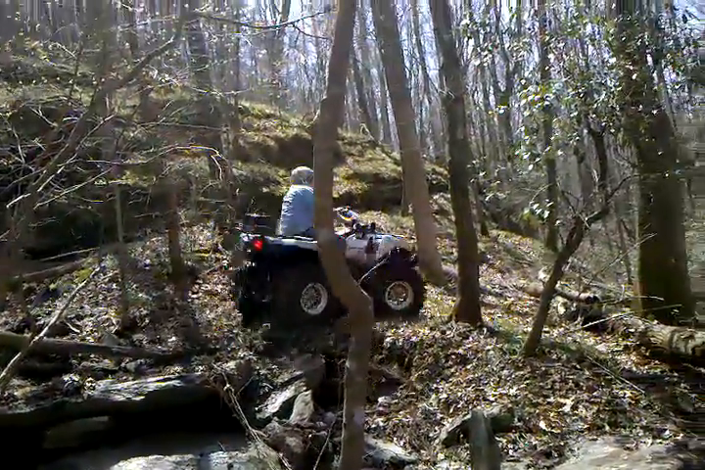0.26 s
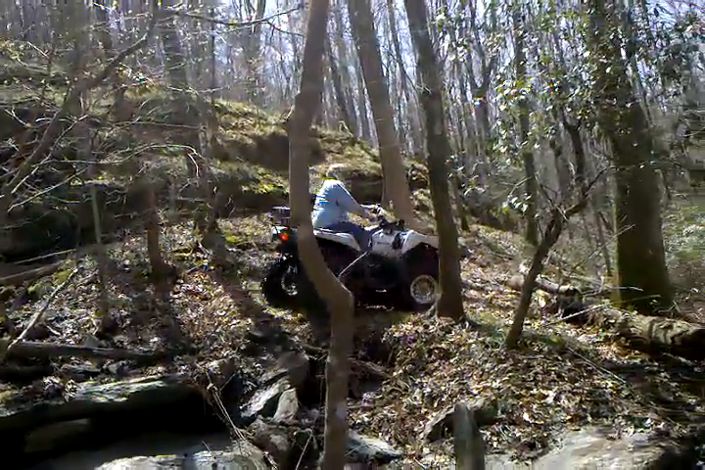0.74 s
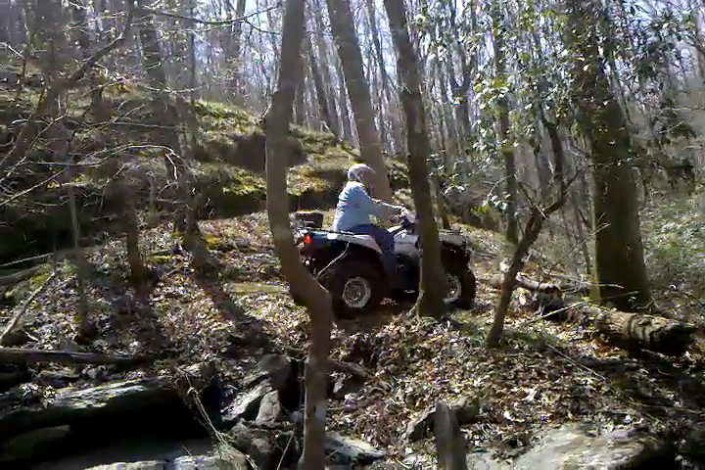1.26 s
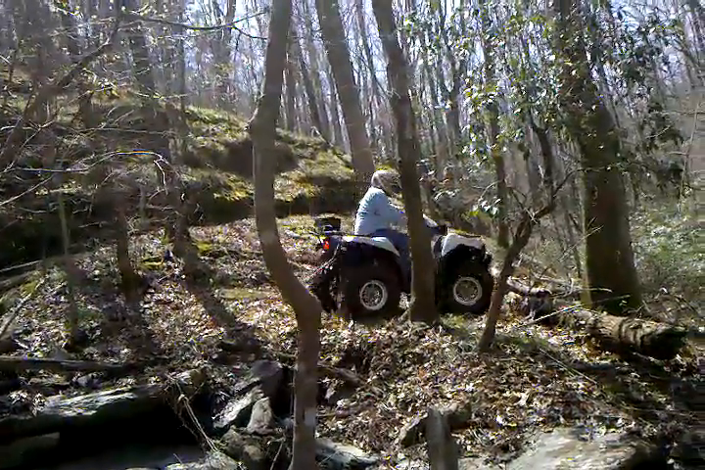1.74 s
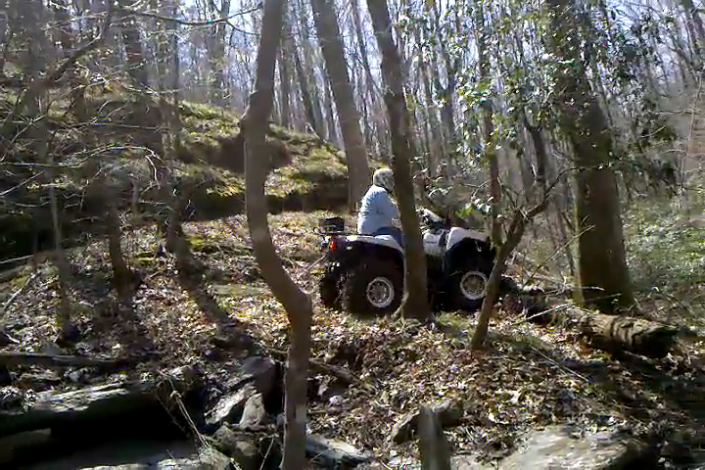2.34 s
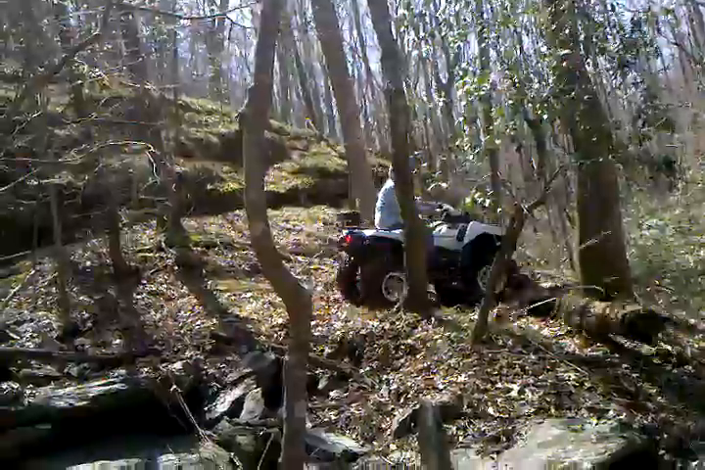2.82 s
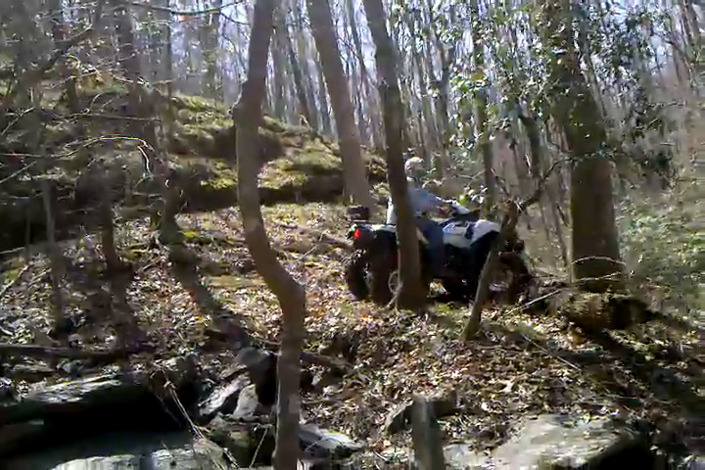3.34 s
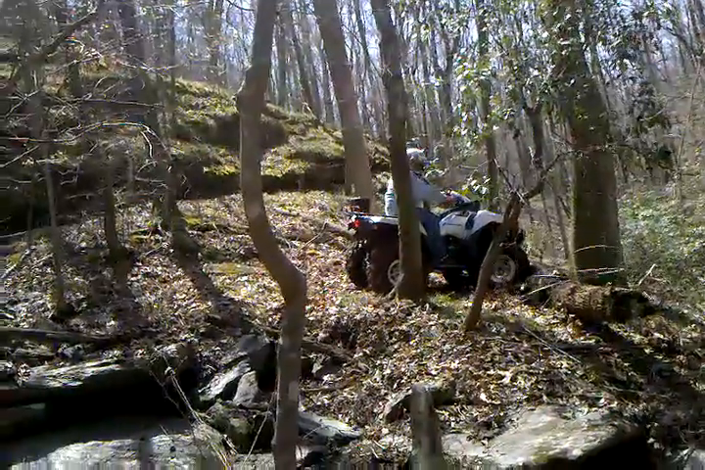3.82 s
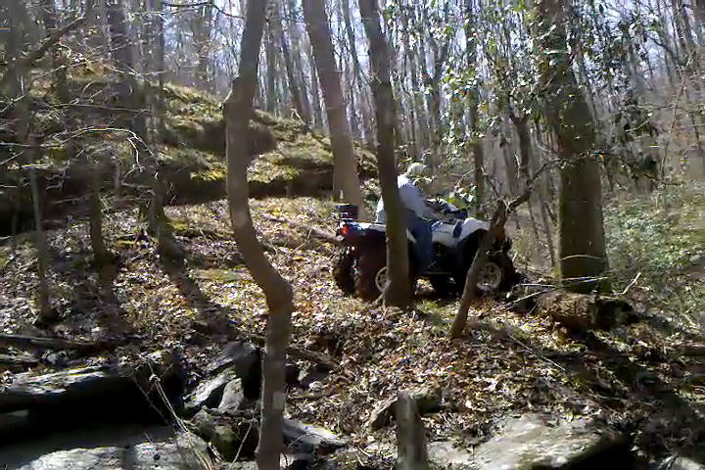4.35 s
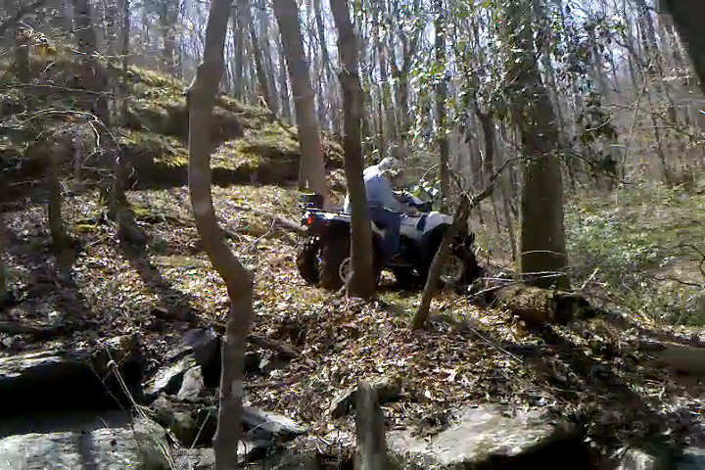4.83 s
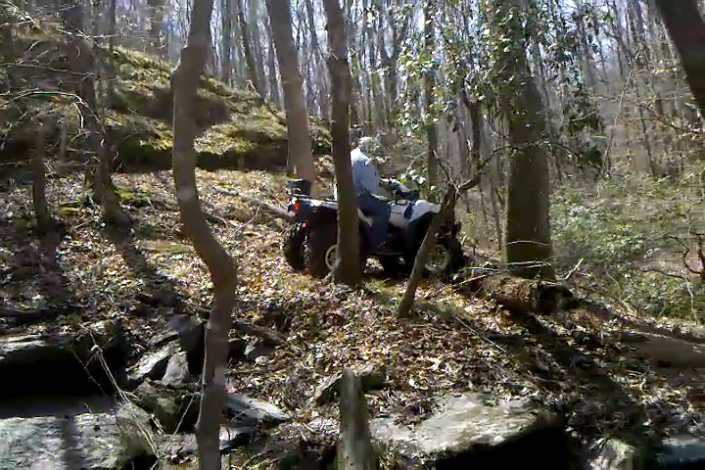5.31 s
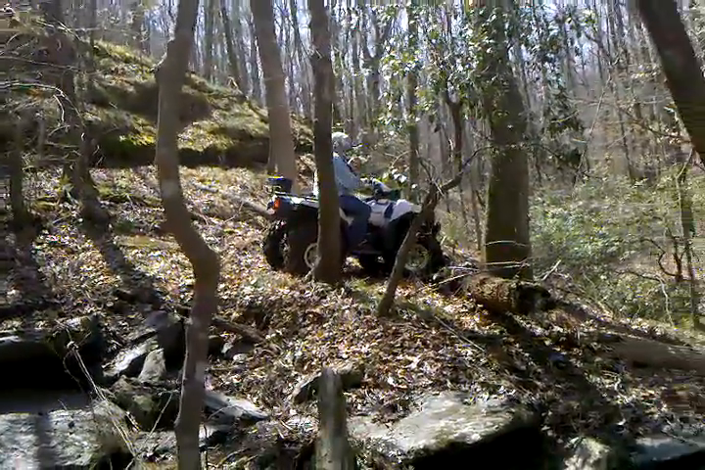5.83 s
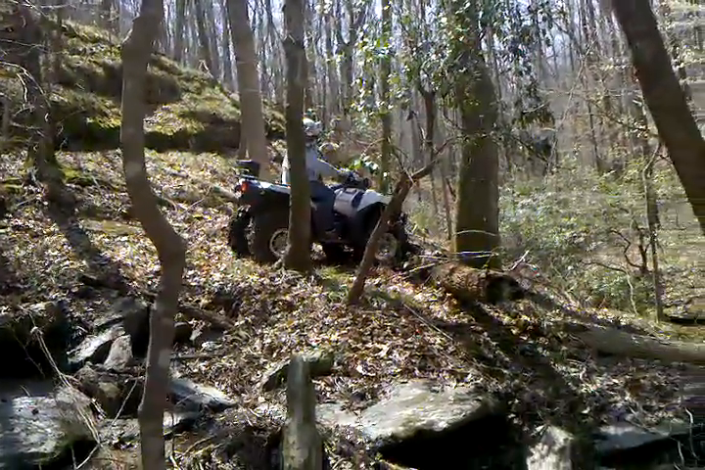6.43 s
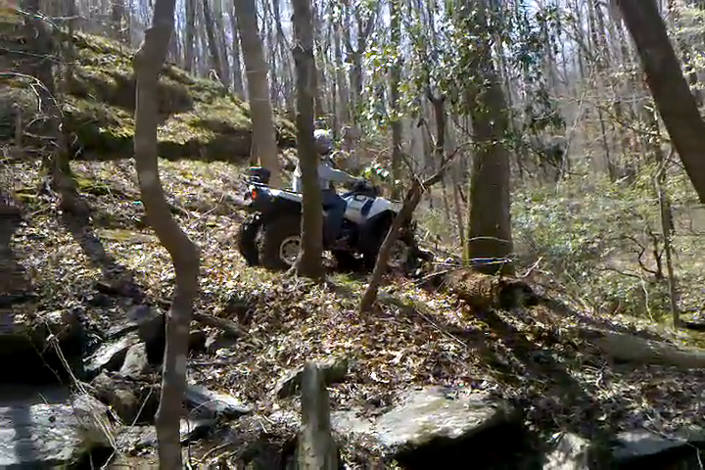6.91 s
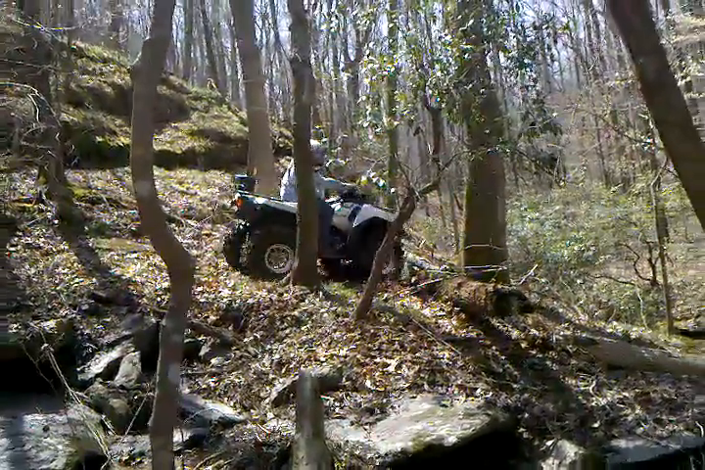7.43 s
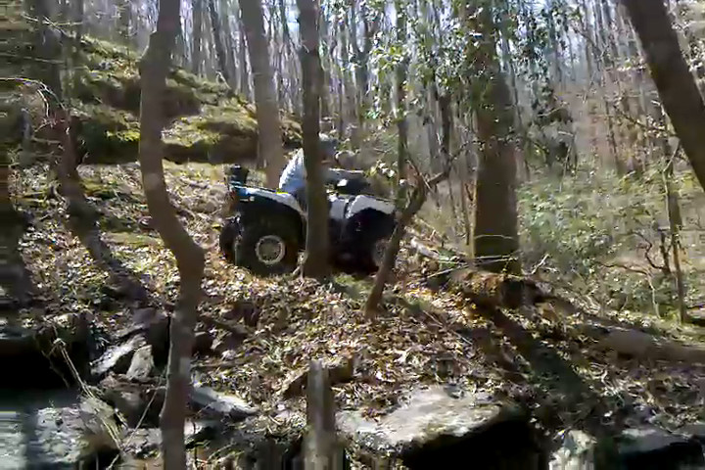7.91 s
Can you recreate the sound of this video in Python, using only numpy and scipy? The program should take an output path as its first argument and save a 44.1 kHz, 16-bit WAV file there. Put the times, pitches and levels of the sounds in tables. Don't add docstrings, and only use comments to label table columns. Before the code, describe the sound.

A single-cylinder quad bike thumps slowly outdoors in a wood, with short soft throttle blips, then settles into an uneven idle. Leaves crunch and twigs snap in clusters around three and five seconds. After six seconds it revs in stronger bursts, firing nearly twice as fast with rougher barks and loud leaf crunches. Rattle and brook hiss run throughout; a small microphone gives thin bass and dull treble.

```python
import sys
import numpy as np
from scipy import signal
from scipy.io import wavfile

SR = 44100
rng = np.random.default_rng(int(sys.argv[2]) if len(sys.argv) > 2 else 0)


def amplitude_ratio(level_db):
    exponent = np.asarray(level_db, float) / 20
    return 10 ** exponent


def put_to_file(sound):
    columns = np.atleast_2d(sound).T
    safe = np.clip(columns, -1, 1)
    whole_steps = np.round(safe * 32767)
    wavfile.write(sys.argv[1], SR, whole_steps.astype(np.int16))


N = 359856
IDLE_DB = -28


def rms_one(x):
    return x / np.sqrt(np.mean(x ** 2) + 1e-20)


def over_time(times_s, values):
    return np.interp(np.arange(N) / SR, times_s, values)


def resonance(x, hz, width_hz):
    r = np.exp(-np.pi * width_hz / SR)
    feedback = [1, -2 * r * np.cos(2 * np.pi * hz / SR), r * r]
    return signal.lfilter(np.array([1, 0, -1]) * (1 - r * r) / 2, feedback, x)


def rings(drive, modes):
    total = 0
    for k, (hz, width_hz, db) in enumerate(modes):
        total = total + (-1) ** k * amplitude_ratio(db) * resonance(drive, hz, width_hz) / np.sqrt(width_hz)
    return rms_one(total)


def band(x, low_hz, high_hz):
    return signal.sosfilt(signal.butter(2, [low_hz, high_hz], "band", fs=SR, output="sos"), x)


def drift(rate_hz):
    r = np.exp(-80 * np.pi * rate_hz / SR)
    slow = signal.lfilter([1], [1, -2 * r, r * r], rng.standard_normal(N // 40 + 2002))[2000:]
    return np.interp(np.arange(N) / 40, np.arange(len(slow)), rms_one(slow))


def clicks(seconds, sizes):
    out = np.full(N + SR, 1e-18)
    np.add.at(out, np.round(np.asarray(seconds) * SR).astype(int), sizes)
    return out[:N]


def grains(per_s, spread_db):
    sizes = amplitude_ratio(spread_db * np.minimum(rng.exponential(1, (2, N)), 5))
    sizes = sizes * rng.choice([-1, 1], (2, N))
    return sizes * (rng.random((2, N)) < per_s / SR)


def coloured(sources, spectrum, patchy_db):
    hz, level_db = np.transpose(spectrum)
    out, edges = 0, 200 * 2 ** np.arange(0, 5.5, 1 / 3)
    for k, (low, high) in enumerate(zip(edges, edges[1:])):
        gain_db = np.interp(np.log(low * high) / 2, np.log(hz), level_db, left=-60)
        flicker_db = patchy_db * drift(21)
        out = out + amplitude_ratio(gain_db + flicker_db) * band(sources[k % 2], low, high)
    return rms_one(out)


def firings():
    # firings so far, gap to the next/ms
    pace = [(0, 61.57), (5, 73.93), (9, 63.35), (14, 61.44), (25, 82.27), (37, 60.65), (49, 87.25),
            (52, 71.67), (57, 87.74), (82, 86.12), (83, 71.03), (100, 41.52), (108, 40.35), (116, 53.45),
            (121, 37.4), (126, 34.8)]
    # firings so far, change of the gap/ms
    flicks = [
        (32, -6.46),
        (41, -9.99),
        (42, -13.87),
        (51, -16.86),
        (82, -30.88),
        (87, -14.09),
        (96, -6.21),
        (114, -11.65),
    ]
    # from t/s, hold/s, pressure above idle/dB
    throttle = [(.12, .12, 1), (.33, .25, 3), (.6, .1, 6.5), (.74, .34, 7.3), (1.39, .12, 2.5),
                (1.85, .25, 2.5), (2.17, .04, 4.5), (2.24, .12, 7), (2.5, .1, 6.5), (2.81, .08, 6.7),
                (3.52, .08, 3.3), (3.94, .04, 2), (6.11, .15, 10), (6.27, .55, 8), (6.43, .05, 9),
                (6.8, .04, 10.5), (6.86, .08, 12), (6.9, .5, 11), (7.38, .15, 11), (7.55, .36, 10.7),
                (7.9, .3, 12.2)]
    # t/s, loss/dB
    lean = [
        (.018, -8),
        (1.266, -5),
        (2.449, -1.5),
        (2.995, -8),
        (3.37, -2),
        (7.629, -1.5),
    ]
    first_s, flick_fades_firings, closing_db_per_s = .0167, 2.5, 25
    count, gap_ms = np.transpose(pace)
    each = np.arange(count[-1] + 1)
    gaps = np.interp(each, count, gap_ms)
    for first, change_ms in flicks:
        gaps += change_ms * (each >= first) * np.exp(-abs(each - first) / flick_fades_firings)
    at = first_s + np.r_[0, np.cumsum(gaps)] / 1000
    open_db = []
    for s, hold_s, db in throttle:
        sag_db = closing_db_per_s * np.maximum(at - s - hold_s, 0)
        open_db.append((at >= s) * (db - sag_db))
    level_db = IDLE_DB + np.maximum(np.max(open_db, axis=0), 0)
    for s, loss_db in lean:
        level_db[np.argmin(abs(at - s))] += loss_db
    return at, amplitude_ratio(level_db)


def baffles(x):
    return x - 2 * resonance(x, 225, 75)


def silencer(at, pressure):
    # from t/s, push lag/ms, push share, return lag/ms, return share
    after_puffs = [(0, 11.9, 0.92, 19.4, -0.94), (0.6, 12, 0.95, 16.3, 0.95),
                   (1.25, 13.4, 0.49, 20.5, -0.88), (2.17, 11.1, 0.89, 26.3, -0.44),
                   (3, 15.8, -0.86, 20.1, -1.09), (3.5, 7.4, 0.54, 18.1, 1.1),
                   (3.93, 6.03, -0.6, 21.75, -0.62), (6.1, 10.5, 0.69, 18.6, 0.26),
                   (6.85, 6.95, -0.29, 14, -0.5), (7.43, 10.4, 0.68, 18.3, 0.17),
                   (7.9, 7.23, -0.63, 27.3, -0.37)]
    # f/Hz, width/Hz
    pipe_modes = [(70.0, 240.5), (80.0, 274.3)]
    # f/Hz, width/Hz, gain
    chambers = [(145.0, 28.01, 16.48), (145.0, 22.57, -23.79), (225.09, 41.06, 1.32), (70.0, 44.65, 0.67),
                (328.3, 120.0, 0.74)]
    idle_puff_ms, sharper_ms_per_db, shortest_puff_ms = 1.15, .065, .47
    after_puffs = np.array(after_puffs)
    stretch = np.searchsorted(after_puffs[:, 0], at + .006) - 1
    _, push_ms, push, back_ms, back = after_puffs[stretch].T
    gas = 0
    for k in np.unique(stretch):
        size = pressure * (stretch == k)
        train = clicks(at, size)
        train = train + clicks(at + push_ms / 1000, size * push)
        train = train + clicks(at + back_ms / 1000, size * back)
        load_db = 20 * np.log10(size[size > 0].mean()) - IDLE_DB
        puff_ms = max(idle_puff_ms - sharper_ms_per_db * load_db, shortest_puff_ms)
        puff = signal.windows.gaussian(501, puff_ms / 1000 * SR)
        gas = gas + signal.oaconvolve(train, puff, "same")
    for hz, width_hz in pipe_modes:
        gas = resonance(gas, hz, width_hz)
    thump = -.8945 * gas
    for hz, width_hz, gain in chambers:
        thump = thump + gain * resonance(gas, hz, width_hz)
    thump = baffles(thump - .55 * resonance(thump, 55, 34))
    revs = np.clip(over_time(at, (1 / np.gradient(at) - 19) / 5), 0, 1)
    return thump - revs * resonance(thump, 66, 60)


def tail_pipe(at, pressure, bark_db):
    # f/Hz, width/Hz, level/dB
    tail_modes = [(309, 45, 0), (368, 13, -4.5), (600, 65, 3.5), (1070, 440, 0), (1454, 120, 0),
                  (1701, 47, -0.5), (2200, 120, -4.5), (3015, 140, -3), (3560, 180, -5)]
    uneven = pressure ** 1.33 * amplitude_ratio(1.9 * rng.standard_normal(len(at)))
    r = np.exp(-1 / (0.0044 * SR))
    jet = signal.lfilter([1], [1, -2 * r, r * r], clicks(np.maximum(at - .002, 0), uneven))
    turbulence = rms_one(jet * rng.standard_normal(N))
    front = rms_one(clicks(at + .005, uneven))
    return amplitude_ratio(bark_db) * rings(turbulence + front, tail_modes)


def rattle(level_db):
    # f/Hz, level per Hz/dB
    hiss_colour = [(140, -27.5), (240, 0.5), (254, -15), (375, -14), (508, -17), (639, -13), (1630, -14.5),
                   (2140, -19), (4040, -23), (6310, -25.5), (7500, -43), (9750, -69), (16500, -120)]
    hiss = rng.standard_normal((2, N)) + 0.5 * grains(900, spread_db=7.5)
    return amplitude_ratio(level_db - 0.5) * coloured(hiss, hiss_colour, patchy_db=0.67)


def panels(level_db):
    # f/Hz, width/Hz, level/dB
    cover_modes = [(558, 110, 5), (1081, 24, -1), (1237, 180, -3.5), (1690, 50, -2.5), (2160, 51, -4),
                   (2623, 110, -6.5), (3050, 52, -10.5), (3720, 67, -10)]
    return amplitude_ratio(level_db) * rings(grains(1500, spread_db=2.5)[0], cover_modes)


def far_echoes():
    return amplitude_ratio(-53) * rms_one(band(rng.standard_normal(N), 60, 190))


def rolling():
    # peak t/s, peak level/dB, time to rise 10 dB/s, time to fall 10 dB/s
    crunches = [(.41, -51.5, .1, .1), (.91, -54, .9, 2), (1.86, -48.5, .025, .05), (2.27, -54, .05, .4),
                (2.66, -53.5, .5, .3), (2.82, -48.5, .035, 1.5), (3.22, -45, .12, .045),
                (3.38, -50, .055, .25), (3.5, -49, .13, .2), (3.57, -44.5, .05, .07), (3.62, -52.5, .1, .6),
                (4.75, -47, .015, .04), (4.82, -50, .035, .035), (5, -48.5, .025, .025),
                (5.11, -48.5, .025, .12), (5.2, -47.5, .02, .28), (5.57, -51.5, .25, .2),
                (5.8, -43, .045, .08), (5.95, -52, .5, .2), (6.14, -42, .02, .025), (6.48, -40.5, .09, .08),
                (6.5, -46, .1, .24), (6.95, -48.5, .4, .05), (7.21, -37, .05, .06), (7.3, -41.5, .055, .16),
                (7.55, -52, .5, .6), (7.95, -36, .05, .06), (8.07, -41, .17, .07)]
    still_db = -58
    t = np.arange(0, N, 32) / SR
    each = [db - 10 * np.maximum((s - t) / rise, (t - s) / fall) for s, db, rise, fall in crunches]
    return over_time(t, np.maximum(np.max(each, axis=0), still_db))


def leaves(level_db):
    # f/Hz, level per Hz/dB
    crackle_colour = [(1500, -13.5), (2500, -10.5), (3500, -6.5), (5000, -7.5), (6500, -4.5), (7600, -1.5)]
    sink_db = np.minimum(level_db + 56, 0)
    crush_db = level_db + sink_db + drift(18)
    return amplitude_ratio(crush_db) * coloured(grains(5000, spread_db=2.0), crackle_colour, patchy_db=2.0)


def rack():
    # from t/s, loudest t/s, until t/s, level/dB, f/Hz, width/Hz
    rasp = (.3, .85, 1.35, -61, 2200, 130)
    start, top, end, level_db, hz, width_hz = rasp
    swell = over_time([start, top, end], [0, 1, 0]) ** .5
    buzz = rms_one(resonance(grains(2000, spread_db=2.5)[0], hz, width_hz))
    return amplitude_ratio(level_db + 2 * drift(15)) * swell * buzz


def snaps():
    # t/s, low part level/dB, high part level/dB, t60/s, wood f/Hz
    breaks = [(0.389, -30, -56.5, 0.064, 589), (1.852, -46, -35.5, 0.087, 689),
              (2.759, -39.5, -55, 0.12, 1050), (2.814, -30.5, -32, 0.062, 1040),
              (3.002, -44, -30, 0.04, 552), (3.347, -29.5, -45, 0.25, 643), (3.367, -29, -54, 0.041, 1340),
              (3.48, -36.5, -33.5, 0.055, 1060), (3.55, -28.5, -36, 0.07, 619),
              (4.648, -35.5, -54.5, 0.096, 603), (4.75, -38, -42.5, 0.2, 1080),
              (4.8, -30, -35.5, 0.14, 1390), (4.819, -34, -57, 0.2, 966), (4.869, -43, -38.5, 0.07, 600),
              (4.916, -30, -39, 0.087, 635), (4.987, -31.5, -45, 0.07, 608), (5.121, -36, -41, 0.13, 651),
              (5.173, -33.5, -34.5, 0.099, 1550), (6.135, -27.5, -43, 0.11, 659),
              (6.192, -34.5, -36.5, 0.21, 563), (6.415, -54.5, -34.5, 0.099, 506)]
    out = np.zeros(N)
    t = np.arange(SR // 5) / SR
    for s, low_db, high_db, t60, wood_hz in breaks:
        i = round(s * SR)
        splinters = rng.standard_normal((2, len(t))) * amplitude_ratio(7.3 * rng.standard_normal((2, len(t))))
        shape = amplitude_ratio(-5 - 60 * t / max(t60, .01)) * np.minimum(t / 0.00013, 1)
        wood = resonance(splinters[0], wood_hz, 160)
        wood = wood + .5 * resonance(splinters[0], 1.44 * wood_hz, 350)
        brittle = band(splinters[1], 2000, 11000)
        out[i:i + len(t)] += shape * (amplitude_ratio(low_db) * rms_one(wood) + amplitude_ratio(high_db) * rms_one(brittle))
    return out


def scene():
    # t/s, engine in view/dB, tail pipe aimed here/dB, jolting of the frame/dB
    stance = [(0, 3, -3, 0), (1.1, .5, -2, 0), (1.8, 2.5, 0, -2), (2.3, -.5, 4, 1), (2.6, -.5, 3, 0),
              (2.9, 0, 7, 2), (3.3, -1, 3, 3), (3.6, 1.5, 1, 0), (4.1, .5, 1, 0), (6.1, 1, 1, 0),
              (6.35, -1, 2, 1), (6.7, -2, 1.5, -1), (7.05, 0, 3, -8), (7.6, -2.5, -1, -4), (7.9, -2, 5, 4),
              (8.16, -1, 2, -1)]
    at, pressure = firings()
    s, *columns = np.transpose(stance)
    view_db, aim_db, jolt_db = [over_time(s, column) for column in columns]
    faster = over_time(at, 1 / np.gradient(at)) - 11.5
    rattle_db = np.maximum(-51 + .72 * faster + view_db, -50.5)
    engine = amplitude_ratio(1.2) * silencer(at - .0032, pressure)
    engine = engine + tail_pipe(at, pressure, -53 + aim_db)
    engine = engine + rattle(rattle_db) + panels(rattle_db - 6 + jolt_db)
    ground = leaves(rolling()) + rack() + snaps()
    return (engine + far_echoes() + ground)[None]


def band_limit(x):
    return signal.sosfilt(signal.butter(12, 9130, fs=SR, output="sos"), x)


def record(dry):
    x = signal.sosfilt(signal.butter(4, 69, "high", fs=SR, output="sos"), dry)
    x = signal.sosfilt(signal.cheby2(9, 50, 8130, fs=SR, output="sos"), x)
    mirrored = x * np.cos(2 * np.pi * 14850 * np.arange(N) / SR)
    image = signal.sosfilt(signal.butter(8, [7700, 9000], "band", fs=SR, output="sos"), mirrored)
    return band_limit(x + amplitude_ratio(-30) * image)


dry = scene()
out = record(dry)
put_to_file(out)
```